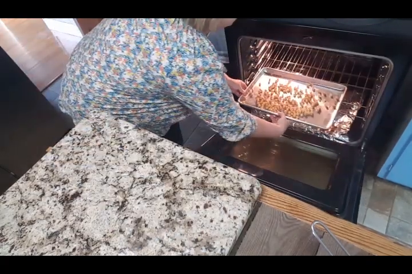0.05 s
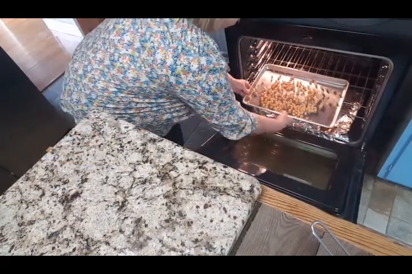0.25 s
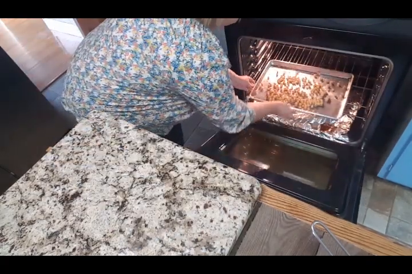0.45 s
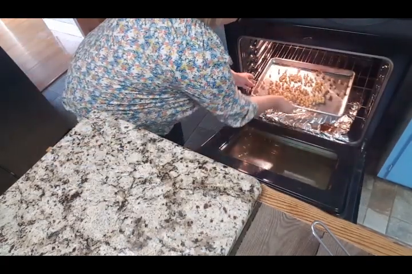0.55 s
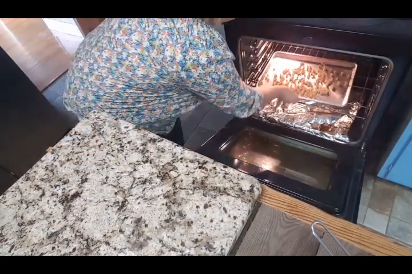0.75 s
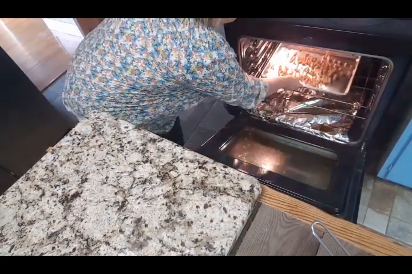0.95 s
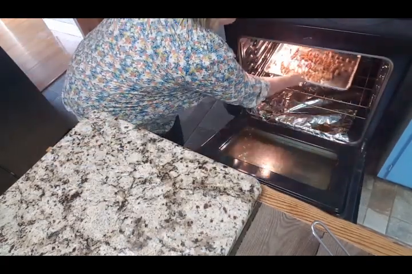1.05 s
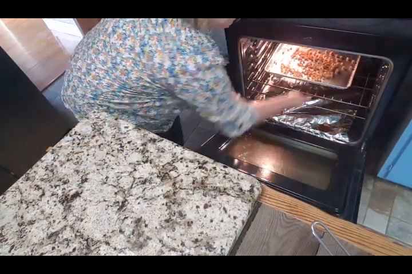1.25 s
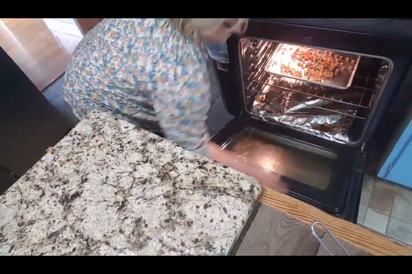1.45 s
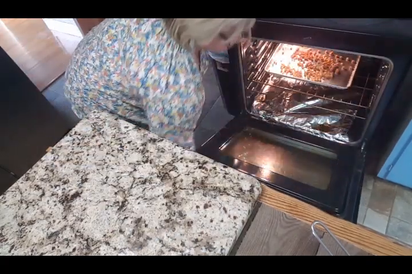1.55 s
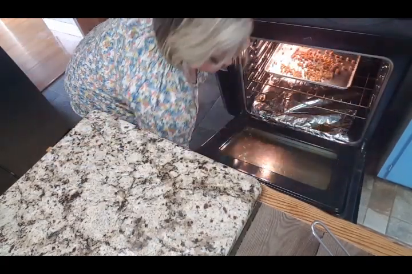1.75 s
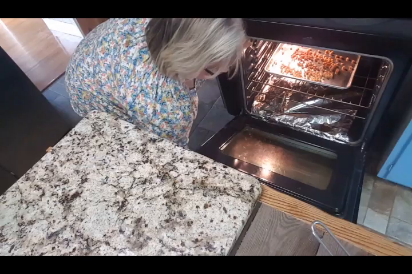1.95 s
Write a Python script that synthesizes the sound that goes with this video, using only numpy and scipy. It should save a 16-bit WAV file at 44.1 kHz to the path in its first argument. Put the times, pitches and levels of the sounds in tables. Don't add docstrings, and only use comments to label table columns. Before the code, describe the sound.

After a hushed start, a steel baking pan strikes and chatters across a wire oven rack, rubs along it, gets a second shove, and settles with faint ticks over low room tone, in stereo leaning left.

```python
import sys
import numpy as np
from scipy import signal
from scipy.fft import rfft, irfft, next_fast_len
from scipy.io import wavfile

SR = 44100
rng = np.random.default_rng(int(sys.argv[2]) if len(sys.argv) > 2 else 0)


def gain_from_db(level_db):
    decades = np.asarray(level_db, float) / 20
    return 10 ** decades


def store_wav(level_fs):
    pcm = np.round(np.clip(np.atleast_2d(level_fs), -1, 1) * 32767)
    wavfile.write(sys.argv[1], SR, pcm.T.astype(np.int16))


N = 88200


def unit(x):
    return x / np.sqrt(np.mean(x ** 2) + 1e-20)


def along(points, hz):
    point_hz, value = np.transpose(points)
    return np.interp(np.log(hz + 1), np.log(point_hz + 1), value)


def filtered(x, response):
    size = next_fast_len(x.shape[-1] + 8192)
    spectrum = rfft(x, size) * response(np.fft.rfftfreq(size, 1 / SR))
    return irfft(spectrum, size)[..., :x.shape[-1]]


def resonant(colour, peaks, lift_db):
    def gain(hz):
        modes = sum(gain_from_db(db) / (1 + (2 * (hz - centre) / width) ** 2) for centre, width, db in peaks)
        return gain_from_db(along(colour, hz)) * (1 + gain_from_db(lift_db) * modes)
    return gain


# pitch_hz, likeness [0-1]
LIKENESS = [(60, 0.78), (180, 1), (540, 0.86), (1600, 0.18), (5000, 0.13), (14000, 0.13)]


def stereo(pair, gain):
    def mid_side(hz):
        angle = np.arccos(np.clip(along(LIKENESS, hz), -1, 1)) / 2
        return gain(hz) * [np.cos(angle), np.sin(angle)]
    mid, side = filtered(pair, mid_side)
    return unit(np.array([mid + side, mid - side]))


# pitch_hz, t60_s
DECAY = [(100, 0.52), (300, 0.91), (1000, 0.57), (3000, 0.56), (7000, 0.4), (14000, 0.31)]


def dying(gain, rise_s):
    noise = stereo(rng.standard_normal((2, SR)), gain)
    hz, frame_s, bands = signal.stft(noise, SR, nperseg=256)
    fade = gain_from_db(-60 * frame_s / along(DECAY, hz)[:, None])
    tail = signal.istft(bands * fade, SR, nperseg=256)[1][:, :SR]
    t = np.arange(SR) / SR
    first_push = gain_from_db(4.5 * np.exp(-t / 0.013))
    return tail * (1 - np.exp(-t / rise_s)) * first_push


def chatter(length_s):
    when = np.sort(rng.random(7))
    when -= when[0]
    luck_db = 4 * rng.standard_normal(7) * (when > 0)
    strength = gain_from_db(luck_db - 6 * when)
    strength /= np.linalg.norm(strength)
    taps = np.bincount((when * length_s * SR).astype(int), strength, minlength=SR)
    power_fade = gain_from_db(-120 * np.arange(SR) / SR / 0.006)
    return np.abs(signal.fftconvolve(taps ** 2, power_fade)[:SR]) ** .5


# start_s, clack_db, clang_db, boom_db, chatter_s
BLOWS = [(0.2118, -23.5, -57, -32, 0.0049), (0.224, -29, -34, -33, 0.0068), (.24, -31.5, -29, -34, .02),
         (0.289, -30.5, -26, -38.5, 0.019), (.315, -52, -29.5, -29.5, .015), (.405, -63, -36.5, -30, 0.013),
         (0.4517, -23.5, -27, -36, 0.01), (.476, -33, -23.5, -27, 0.017), (.506, -26, -27, -26.5, 0.0092),
         (.522, -29.5, -26.5, -38, 0.014), (0.59, -31.5, -40, -35, 0.023), (0.6448, -30, -23.5, -25, 0.013),
         (0.699, -35.5, -52, -28, 0.031), (.8061, -42.5, -47, -45, 0.0017), (.84, -69, -49, -38, 0.039),
         (1.113, -48.5, -49.5, -47, 0.011), (1.1856, -31.5, -28.5, -34, 0.011),
         (1.205, -32.5, -34, -29, 0.039), (1.251, -32.5, -31.5, -34, 0.012),
         (1.285, -34.5, -30, -40.5, 0.036), (1.33, -40.5, -39.5, -35.5, 0.034),
         (1.365, -38, -50, -47, 0.014), (1.54, -54, -70, -68, 0.035), (1.596, -55.5, -55, -65.5, 0.046)]
# pitch_hz, level_db [dB per Hz]
STEEL = [(500, -7.5), (1200, -11), (2300, -5.5), (3400, -4), (5700, -6), (8400, -8), (12000, -9.5),
         (14800, -10.5)]
# pitch_hz, width_hz, level_db
RIM_MODES = [(1974, 52, 8.5), (2230, 87, 3), (2440, 47, -1), (3330, 140, -2), (3510, 72, -1.5),
             (4640, 61, -2), (5060, 32, -18), (6700, 150, 1), (7900, 72, -2)]
# pitch_hz, level_db [dB per Hz]
PAN = [(300, -43), (560, -0.5), (900, 3), (1300, 5.5), (2300, 6.5), (3200, 0.5), (5000, -5.5), (9000, -8)]
# pitch_hz, level_db [dB per Hz]
BOX = [(40, -43), (100, -10.5), (135, -4.5), (250, -3.5), (480, -6), (600, -17.5), (1500, -11), (4000, -58)]
# pitch_hz, width_hz, level_db
OVEN_MODES = [(142.2, 13, -1), (167, 4.7, -5), (219.5, 5.3, 4.5), (276.6, 6.7, 4), (334.8, 6.4, -8),
              (403, 14, -7.5), (425, 4.7, -7.5), (486, 12, -3), (587, 13, -3.5), (676, 37, -6.5),
              (869, 65, -7), (1237, 35, -9.5), (1360, 15, -13), (2610, 360, -17)]


def clatter():
    out = np.zeros((2, N + 2 * SR))
    steel = resonant(STEEL, RIM_MODES, lift_db=-2.5)
    pan = resonant(PAN, OVEN_MODES, lift_db=8.0)
    box = resonant(BOX, OVEN_MODES, lift_db=12.5)
    for start_s, clack_db, clang_db, boom_db, chatter_s in BLOWS:
        cracks = chatter(chatter_s) * unit(filtered(rng.standard_normal(SR), steel))
        clack = gain_from_db(11) * cracks + dying(steel, 0.00066 + 0.15 * chatter_s)
        clang = dying(pan, 0.0015 + 0.44 * chatter_s)
        boom = dying(box, rise_s=0.016)
        blow = gain_from_db(clack_db) * clack + gain_from_db(clang_db) * clang + gain_from_db(boom_db) * boom
        out[:, round(start_s * SR):][:, :SR] += blow
    return out[:, :N]


WIRE_RISE_S = 0.0027
# pitch_hz, level_db, t60_s
WIRES = [(130, -2, .6), (155, -3, .6), (227, -5, .6), (295, -1, 1.8), (308, -5, 2), (421, 0, 1.5),
         (683, -13, .7), (780, -13, 1.2), (862, -6, 1.4), (1158, -2, 1.8), (1405, -15, .8), (1689, -7, 3),
         (2341, -14, 1.2), (2770, -13, 1.2)]


def wires(dull_db_per_khz):
    t = np.arange(2 * SR) / SR
    partner, beat_hz = 0.38, 8
    ring = np.zeros(2 * SR)
    for hz, level_db, t60_s in WIRES:
        luck_db, phase, detune, partner_phase = rng.standard_normal(4)
        split_hz = hz + beat_hz * (1 + 0.372 * detune)
        tone = np.sin(2 * np.pi * hz * t + 9 * phase)
        tone += partner * np.sin(2 * np.pi * split_hz * t + 9 * partner_phase)
        ring += gain_from_db(level_db + luck_db - dull_db_per_khz * hz / 1000 - 60 * t / t60_s) * tone
    return ring * (1 - np.exp(-t / WIRE_RISE_S))


# start_s, level_db, dullness_db_per_khz
SHAKES = [
    (0.2102, -62, 6),
    (.476, -41.5, 15),
    (0.6439, -41, 3),
    (1.1849, -42.5, 1),
    (1.593, -55.5, -0.5),
]


def rack():
    out = np.zeros(N + 2 * SR)
    damping = np.exp(-np.arange(2 * SR) / SR / WIRE_RISE_S)
    for start_s, level_db, dull_db_per_khz in SHAKES:
        ringing = out[round(start_s * SR):][:2 * SR]
        ringing *= damping
        ringing += gain_from_db(level_db) * wires(dull_db_per_khz)
    return out[:N]


# time_s, level_db
SLIDE = [
    (.7, -89),
    (.82, -46.5),
    (1.0, -46.5),
    (1.15, -51),
    (1.3, -33),
    (1.5, -56),
    (1.751, -63.5),
    (2, -66.5),
]
# pitch_hz, level_db [dB per Hz]
RUB = [(290, -41), (500, -64), (618, -71), (683, -3), (1040, -6), (5480, -11.5), (8630, -13),
       (14800, -17.5)]


def slide():
    slips_per_s, uneven_db = 4000, 7.5
    slips = (rng.random((2, N)) < slips_per_s / SR) * rng.standard_normal((2, N))
    slips *= gain_from_db(uneven_db * rng.standard_normal((2, N)))
    hiss = 1.85 * rng.standard_normal((2, N))
    rub = stereo(unit(slips) + hiss, lambda hz: gain_from_db(along(RUB, hz)))
    time_s, level_db = np.transpose(SLIDE)
    return gain_from_db(np.interp(np.arange(N) / SR, time_s, level_db)) * rub


# pitch_hz, level_db [dB per Hz]
HUSH = [(25, 6.5), (50, -6), (110, -9.5), (200, -13), (350, -12.5), (550, -23), (2000, -27), (14800, -38.5)]
# pitch_hz, lift_db
GATE = [(60, 11), (300, -6.5), (3000, 8), (12000, 8.5)]


def kitchen():
    t = np.arange(N) / SR
    room = gain_from_db(-61.5) * stereo(rng.standard_normal((2, N)), lambda hz: gain_from_db(along(HUSH, hz)))
    hum = gain_from_db(-82) * np.sin(2 * np.pi * 355 * t)
    shut = room + hum
    opened = filtered(shut, lambda hz: gain_from_db(along(GATE, hz)))
    return np.where(t < 0.21, shut, opened)


# pitch_hz, left_over_right_db
LEAN = [(60, 3), (240, 0.5), (930, 2.5), (3650, 1.0), (14300, 3.5)]


def scene():
    lag_s = 0.0002

    def near(hz):
        level = gain_from_db(np.outer([.5, -.5], along(LEAN, hz)))
        return level * np.exp(np.outer([1j, -1j], np.pi * hz * lag_s))
    return filtered(clatter() + rack() + slide(), near) + kitchen()


def low_pass(x):
    return signal.sosfilt(signal.butter(12, 14930, fs=SR, output="sos"), x)


def record(dry):
    port_hz, port_width_hz, port_db = 8450, 800, 1
    bass_cut_hz, top_hz, top_slope_hz = 85, 14850, 90

    def microphone(hz):
        damping = 1j * hz * port_width_hz
        port = 1 + gain_from_db(port_db) * damping / (port_hz ** 2 - hz ** 2 + damping)
        bass_cut = (1j * hz / (bass_cut_hz + 1j * hz)) ** 2
        top = (1 - np.tanh((hz - top_hz) / top_slope_hz)) / 2
        return port * bass_cut * top
    mix = filtered(dry, microphone)
    return low_pass(mix)


dry = scene()
out = record(dry)
store_wav(out)
```